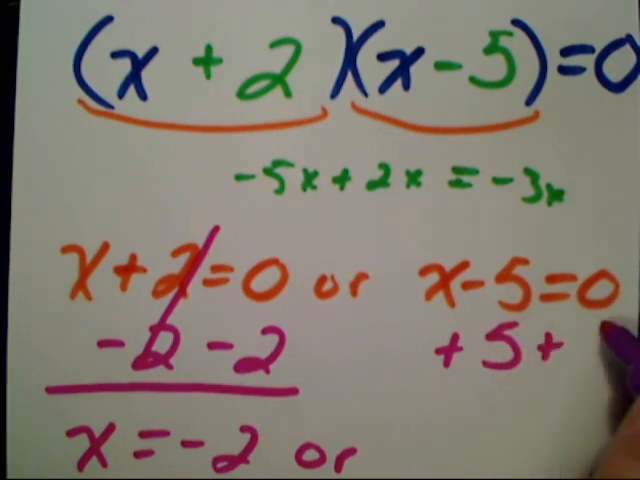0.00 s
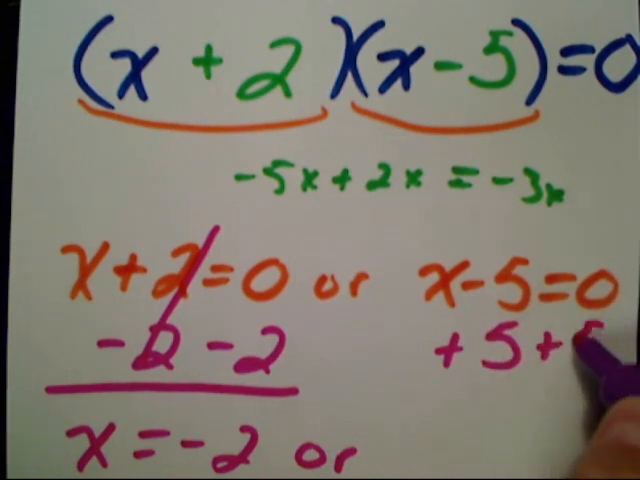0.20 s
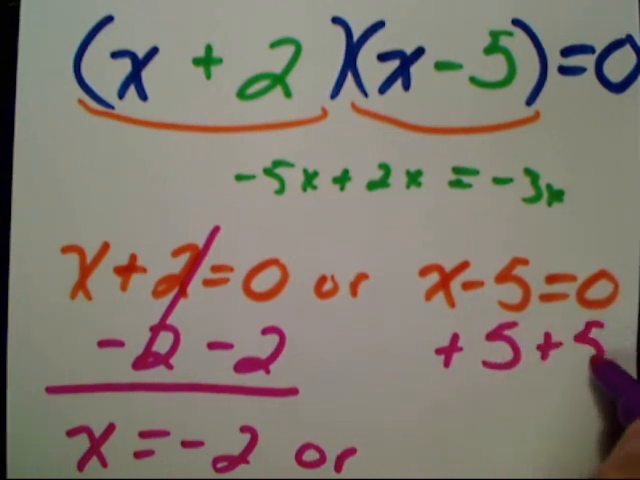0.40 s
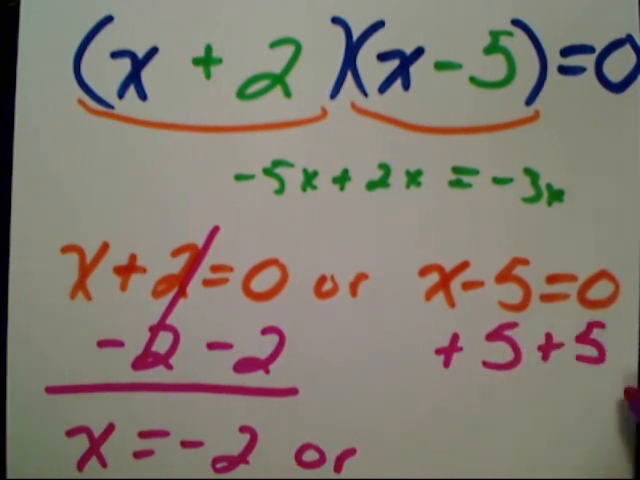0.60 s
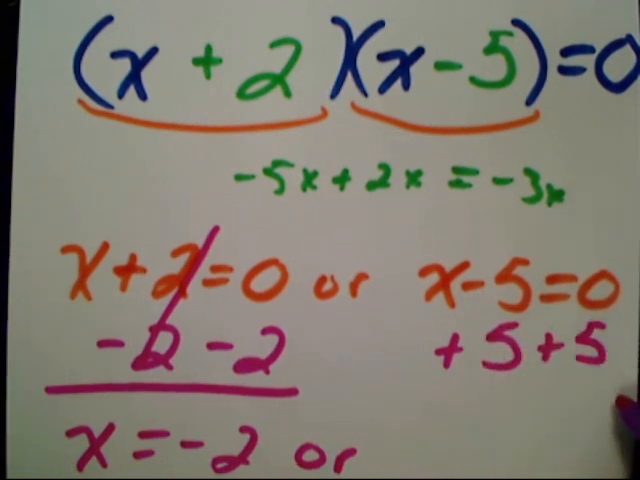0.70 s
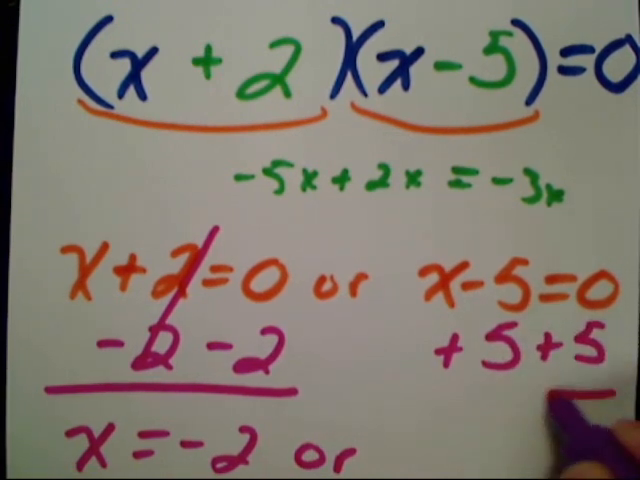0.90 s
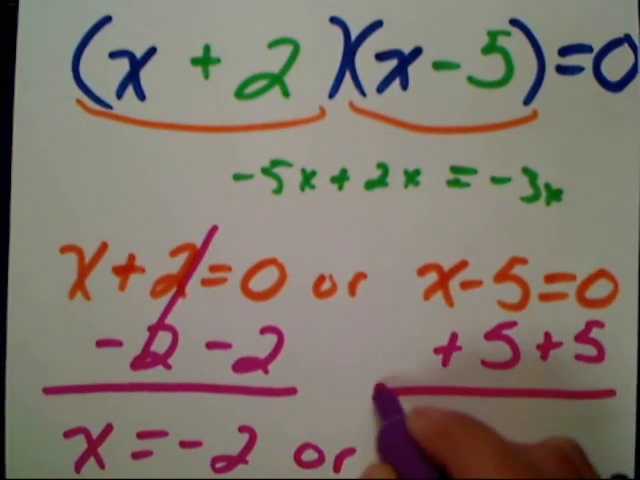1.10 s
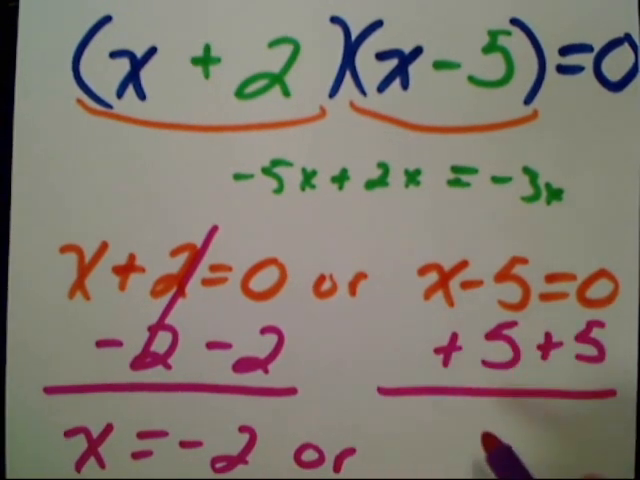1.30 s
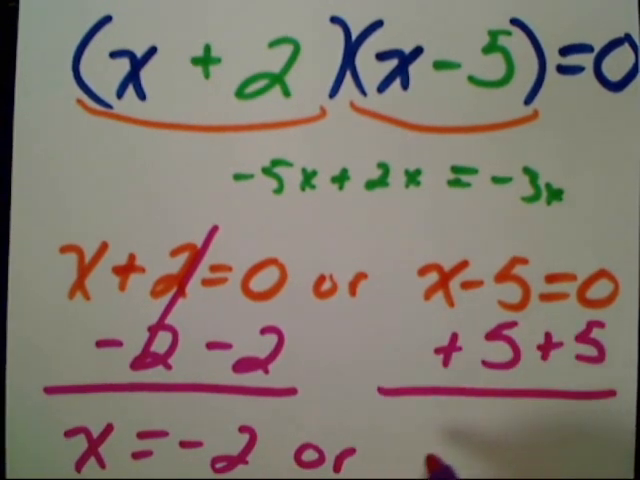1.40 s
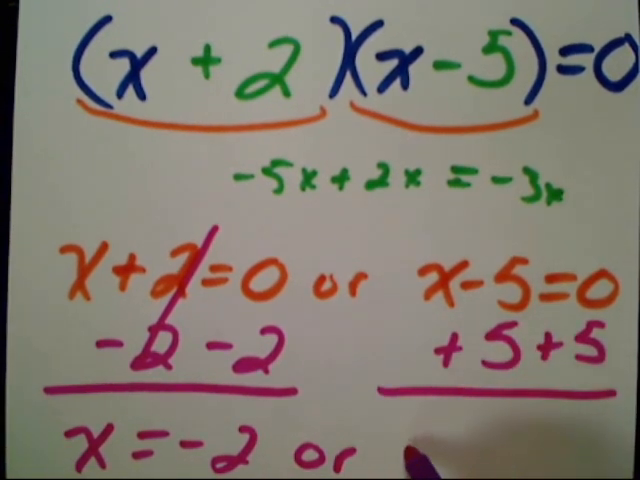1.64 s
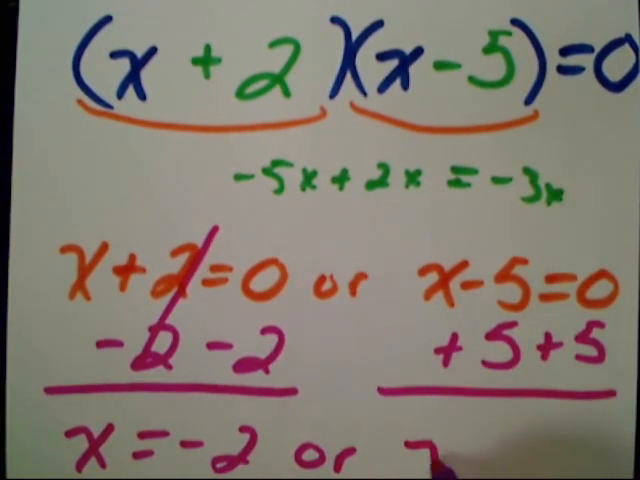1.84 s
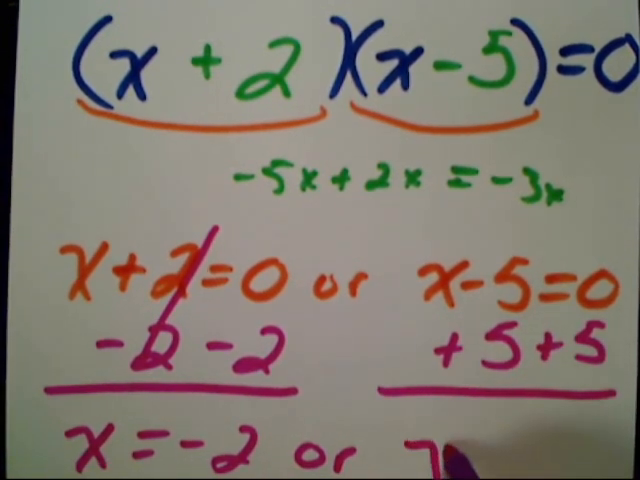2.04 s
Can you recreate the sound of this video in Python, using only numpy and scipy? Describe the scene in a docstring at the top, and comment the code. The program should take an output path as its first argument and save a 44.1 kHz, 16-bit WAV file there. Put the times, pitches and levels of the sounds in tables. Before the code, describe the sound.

A felt-tip marker writes on paper, first a bright scratchy curve, then after a pause a fainter ruled line and three short strokes with small woody taps, close in a small quiet room with steady low hum.

```python
"""A felt-tip marker writes on paper on a desk: a curved figure, a ruled line, then three short strokes.
Each movement is noise full of tiny snags, coloured by the ringing paper sheet, nib and barrel.
The tip lands with a tick of noise and a knock of dying tones; the hand slides as a soft noise.
Behind them lie a low hum and a thin electrical whine, both made of tones, and the room's air as noise.
The room is small and quiet, heard by one microphone."""
import sys
import numpy as np
from scipy import signal
from scipy.fft import rfft, irfft, next_fast_len
from scipy.io import wavfile
from scipy.ndimage import map_coordinates

SR = 44100
rng = np.random.default_rng(int(sys.argv[2]) if len(sys.argv) > 2 else 0)


def generate_wav(signal):
    """Clip the signal to [-1, 1] and save it as 16-bit WAV at the path in sys.argv[1]."""
    frames = np.transpose(np.atleast_2d(signal))
    scaled = np.clip(frames, -1, 1) * 32767
    pcm = np.round(scaled).astype(np.int16)
    wavfile.write(sys.argv[1], SR, pcm)


N = 92610  # samples in the scene, 2.1 s


def amp(db):
    """Turn decibels into a gain."""
    return 10 ** (np.asarray(db) / 20)


def unit(x):
    """Scale a sound to an rms of 1."""
    return x / np.sqrt(np.mean(x ** 2) + 1e-20)


def along(points, hz):
    """Read a curve of (f/Hz, value) points, joined by straight lines on a log frequency axis."""
    point_hz, values = np.transpose(points)
    return np.interp(np.log(hz + 1), np.log(point_hz + 1), values)


def filtered(x, response):
    """Multiply the spectrum of a sound by a response, given as a function of frequency."""
    padded = next_fast_len(N + 8192)  # spare room so that echoes do not wrap round to the start
    hz = np.fft.rfftfreq(padded, 1 / SR)
    return irfft(rfft(x, padded) * response(hz), padded)[:N]


def noise(spectrum):
    """Make noise of rms 1 whose colour follows a table."""
    white = rng.standard_normal(N)
    return unit(filtered(white, lambda hz: amp(along(spectrum, hz))))


def wobble(rate):
    """Draw a smooth random curve through `rate` random points a second."""
    points = rng.standard_normal(2048)
    return map_coordinates(points, [np.arange(N) * rate / SR], mode='wrap')


def bell(hz, centre, width):
    """The shape of one resonance, 1 at its centre and half that at width / 2 to either side."""
    return 1 / (1 + (2 * (hz - centre) / width) ** 2)


def gesture(start, length, rise, fall):
    """A hand movement speeds up, holds and slows to rest; the loudness follows it."""
    t = np.arange(N) / SR - start
    speeding_up = np.sin(np.pi / 2 * np.clip(t / rise, 0, 1))
    slowing_down = np.sin(np.pi / 2 * np.clip((length - t) / fall, 0, 1)) ** 1.22
    return speeding_up * slowing_down


# how long the room rings: time to die away by 60 dB (f/Hz, t60/s)
ROOM_DECAY = [(200, 0.8), (2000, 0.17), (6000, 0.26), (14000, 0.099)]
ROOM_DB = -11.5  # level of the tail against the direct sound


def room(x):
    """Walls return a short tail of dying noise, in which the bass lasts longest."""
    hz, _, spectra = signal.stft(rng.standard_normal(SR // 2), SR, nperseg=256)
    _, t, _ = signal.stft(np.zeros(SR // 2), SR, nperseg=256)
    decay = amp(-60 * t / along(ROOM_DECAY, hz)[:, None])
    tail = signal.istft(spectra * decay, SR, nperseg=256)[1]
    return x + amp(ROOM_DB) * signal.fftconvolve(x, tail / np.linalg.norm(tail))[:N]


# colour of the air in the room (f/Hz, level/dB per Hz)
AIR = [(20, 2), (55, -6), (100, 3), (170, -10.5), (255, -6.5), (330, -14), (500, -15), (800, -24),
       (1500, -26.5), (2500, -29), (4500, -35), (9000, -36.5), (15500, -37.5)]
AIR_DB = -47.5  # rms


def air():
    """The air of the room is a steady noise, strongest in the bass."""
    return amp(AIR_DB) * noise(AIR)


def tone(hz, drift):
    """A sine of rms 1 whose phase drifts (radians)."""
    t = np.arange(N) / SR
    return np.sqrt(2) * np.cos(2 * np.pi * (hz * t + rng.random()) + drift)


# motor and mains hum (f/Hz, rms level/dB, unsteadiness from 0 to 1)
HUM = [(30, -46, 0.8), (53.46, -49, 0), (58.14, -47, 0.57), (78.84, -52, 0.16), (98, -55, 0.18),
       (119.85, -45, 0.22), (237, -72, 0.7), (263, -62.5, .8), (279, -68, 0.3), (354.2, -67.5, 0.1)]


def hum():
    """Motor and mains hum in low tones; the unsteady ones waver in phase and strength."""
    out = np.zeros(N)
    for hz, db, loose in HUM:
        strength = unit(abs(1 + loose * wobble(4.13)))
        out += amp(db) * strength * tone(hz, loose * wobble(4.98))
    return out


# electrical whine (f/Hz, rms level before wavering/dB, waver of the level/dB)
WHINE = [(708, -69.5, 2.5), (1866, -71, 1), (3750, -74, 1.5), (5550, -76, 2.5), (7990, -68, 1.5),
         (12600, -74, 1)]
WHINE_DRIFT = 0.33  # phase drift, radians


def whine():
    """A thin electrical whine of faint tones that waver in level and phase."""
    out = np.zeros(N)
    for hz, db, waver_db in WHINE:
        level = amp(db + waver_db * wobble(18))
        out += level * tone(hz, WHINE_DRIFT * wobble(29.9))
    return out


# slides of the hand (start t/s, length t/s, rise t/s, fall t/s, level/dB)
SLIDES = [(-.05, 0.17, .05, .09, -55.5), (0.17, 0.083, .008, 0.018, -62), (0.563, .17, 0.052, 0.082, -60.5),
          (0.685, 0.18, 0.15, 0.064, -51.5), (1.537, 0.15, 0.25, 0.038, -52.5),
          (1.968, 0.19, 0.084, .12, -50)]
# colour of skin on paper (f/Hz, level/dB per Hz)
SKIN = [(200, -11), (700, -6), (2500, -13.5), (5000, -5), (7000, -8.5), (9800, -3.5), (12500, -3.5),
        (15500, -12.5)]


def hand():
    """The side of the hand brushes across the sheet: one noise that swells with each slide."""
    loudness = sum(amp(db) * gesture(*move) for *move, db in SLIDES)
    return noise(SKIN) * loudness


# landings of the tip (t/s, knock level/dB, tick level/dB)
TAPS = [(1.074, -45, -52), (1.418, -37.5, -49), (1.440, -59, -50), (1.7351, -33, -50.5),
        (1.925, -38.5, -50)]
# ringing of the sheet on the desk (f/Hz, level within the knock/dB, t60/s)
DESK = [(216, -9, .03), (414, -6.5, 0.026), (542, -1.5, 0.02), (786, -3.5, 0.015), (1100, -13, 0.013),
        (1580, -12.5, 0.015)]
# colour of the tick (f/Hz, level/dB per Hz)
TICK = [(500, -12), (2200, 1), (5000, 4), (10000, 6), (15000, 3)]
TICK_T60_S, TAP_ATTACK_S = 0.036, 0.00046  # the tick's 60 dB decay, time constant of the onset


def taps():
    """The soft tip meets the paper: a faint tick of noise and a small woody knock of dying tones."""
    out = np.zeros(N)
    for start, knock_db, tick_db in TAPS:
        t = np.maximum(np.arange(N) / SR - start, 0)
        knock = np.zeros(N)
        for hz, db, t60 in DESK:
            knock += amp(db - 60 * t / t60) * np.sin(2 * np.pi * (hz * t + rng.random()))
        tick = amp(-60 * t / TICK_T60_S) * noise(TICK)
        onset = 1 - np.exp(-t / TAP_ATTACK_S)  # the soft tip rounds the start
        out += onset * (amp(knock_db) * knock + amp(tick_db) * tick)
    return out


SNAGS_PER_S, SNAG_SPREAD_DB = 3500, 2.5
RUB_SHARE = 0.8  # smooth rub's share of the power, the rest is snags
JUDDER_HZ, JUDDER_DB = 183.6, -1.12  # random points a second, depth


def friction():
    """Fibres snag and let go at random over a smooth rub; the felt judders."""
    moments = rng.random(N) < SNAGS_PER_S / SR
    directions = rng.choice([-1, 1], N)
    sizes = amp(SNAG_SPREAD_DB * np.clip(rng.standard_normal(N), -2, 2))
    snags = unit(moments * directions * sizes)
    rub = rng.standard_normal(N)
    judder = amp(JUDDER_DB * wobble(JUDDER_HZ))
    return (np.sqrt(1 - RUB_SHARE) * snags + np.sqrt(RUB_SHARE) * rub) * judder


BODY_HZ, BODY_WIDTH_HZ = 3300, 500  # the body lies below this frequency
TREBLE_HZ, TREBLE_WIDTH_HZ = 8140, 1340  # the treble lies above this one
SHEET_WIDTH_HZ = 220
CANCEL_WIDTH_HZ, CANCEL_DB = 215, -10.5
# colour of felt on paper (f/Hz, level/dB per Hz)
RASP = [(100, -29), (300, -15.5), (520, -3), (800, -10.5), (1400, -7), (2100, -7.5), (2900, -6.5),
        (4200, 0), (6500, 1), (9000, 2), (12300, 1.5), (13500, -1.5), (15700, -8)]
# nib and barrel resonances, low to high (width f/Hz, gain level/dB)
RINGS = [(380, 7), (400, 7.5), (1100, 10)]


def pen_colour(hz, body_db, treble_db, sheet_db, sheet_hz, cancel_hz, *centres):
    """The rasp rings sheet and nib, shifting with the pen's angle; a desk reflection cancels one band."""
    db = along(RASP, hz)
    db = db + body_db * (1 - np.tanh((hz - BODY_HZ) / BODY_WIDTH_HZ)) / 2
    db = db + treble_db * (1 + np.tanh((hz - TREBLE_HZ) / TREBLE_WIDTH_HZ)) / 2
    db = db + sheet_db * bell(hz, sheet_hz, SHEET_WIDTH_HZ)
    db = db + CANCEL_DB * bell(hz, cancel_hz, CANCEL_WIDTH_HZ)
    for centre, (width, gain_db) in zip(centres, RINGS):
        db = db + gain_db * bell(hz, centre, width)
    return amp(db)


DESK_DELAY_S, DESK_ECHO = .0018, 0.068  # longest delay, strength of each near reflection


def near_echoes(hz, count=3):
    """Hand and desk reflect the sound, differently at each place on the sheet."""
    delays = DESK_DELAY_S * rng.uniform(0.463, 1, count)
    return 1 + DESK_ECHO * np.exp(-2j * np.pi * hz * delays[:, None]).sum(0)


# movements of the nib (start t/s, length t/s, rise t/s, fall t/s, level/dB, body level/dB,
# treble level/dB, sheet ring level/dB, sheet f/Hz, cancelled f/Hz,
# low nib resonance f/Hz, middle nib resonance f/Hz, high nib resonance f/Hz)
STROKES = [ (0.208, 0.086, 0.044, 0.023, -32, -6, -4.5, 8.5, 1430, 7940, 5750, 7100, 10300),
           (0.253, 0.13, 0.049, 0.023, -26, -3.5, 4, 6.5, 1010, 6160, 5320, 7260, 10500),
           (0.343, 0.12, 0.059, 0.066, -22, -1.5, 6.5, 3.5, 1490, 5900, 5070, 7250, 10200),
           (0.406, 0.084, 0.044, 0.032, -32, 1.5, 1.5, 3.5, 503, 11800, 4420, 7060, 11900),
           (1.111, 0.077, .033, .035, -39, 5, -5, 12, 1000, 6370, 4130, 5100, 9450),
           (1.166, 0.14, .055, 0.087, -40, 6, -7, 5, 1400, 6800, 4470, 5100, 9700),
           (1.45, 0.042, 0.012, 0.011, -34, 0.5, -0.5, 13.5, 1410, 5600, 4750, 6160, 9970),
           (1.476, 0.048, 0.02, 0.034, -31, -1.5, -3.5, 10, 1470, 5100, 4650, 6000, 9600),
           (1.503, 0.053, 0.014, 0.05, -44, 6.5, -11.5, 10, 1410, 5400, 4620, 6000, 10000),
           (1.753, 0.065, 0.014, 0.067, -37, 4.5, -3, 0, 606, 7900, 5130, 5380, 10020),
           (1.942, 0.053, 0.023, 0.045, -37, 3, -1.5, -4, 1400, 7750, 4300, 5520, 9630)]


def marker():
    """Each movement of the nib rasps with its own colour and stirs the room from its own place."""
    out = np.zeros(N)
    for start, length, rise, fall, db, *colour in STROKES:
        rasp = unit(filtered(friction(), lambda hz: pen_colour(hz, *colour) * near_echoes(hz)))
        out += room(amp(db) * gesture(start, length, rise, fall) * rasp)
    return out


def scene():
    """Writing in the room, the same in both channels."""
    background = hum() + whine() + air()
    mono = background + room(taps() + hand()) + marker()
    return np.array([mono, mono])


TOP_HZ = 15800


def record(dry):
    """The recorder keeps nothing above its band limit."""
    return np.array([filtered(channel, lambda hz: hz < TOP_HZ) for channel in dry])


dry = scene()
out = record(dry)
generate_wav(out)
```